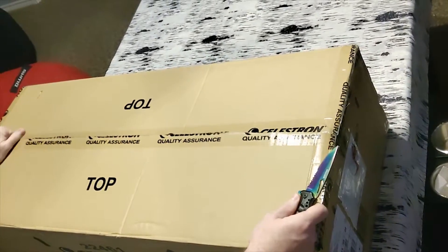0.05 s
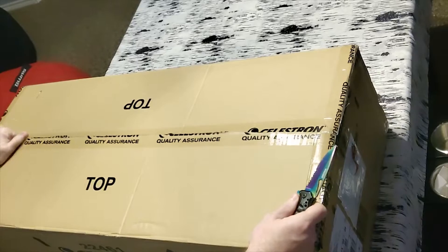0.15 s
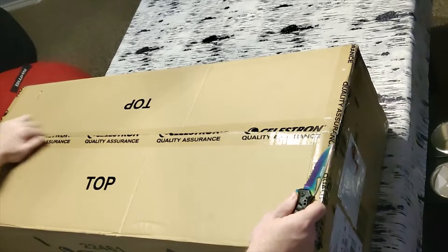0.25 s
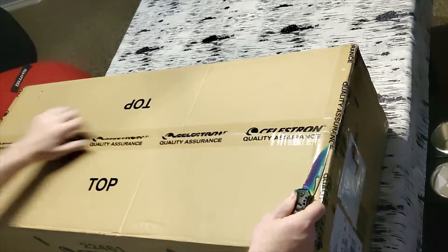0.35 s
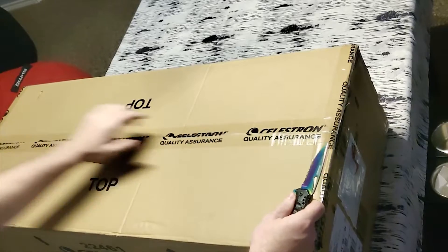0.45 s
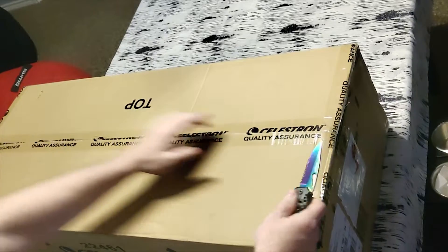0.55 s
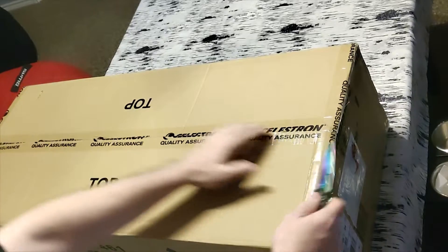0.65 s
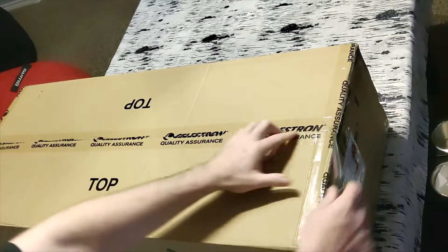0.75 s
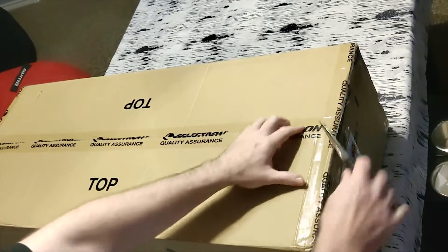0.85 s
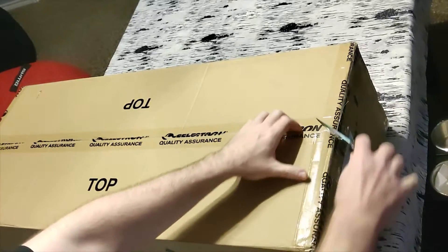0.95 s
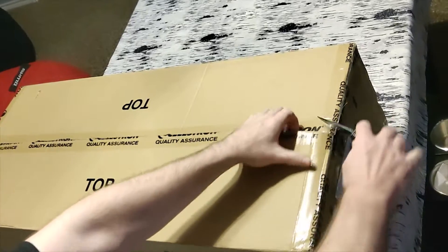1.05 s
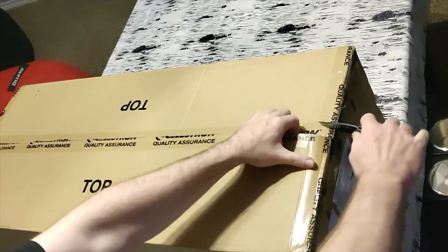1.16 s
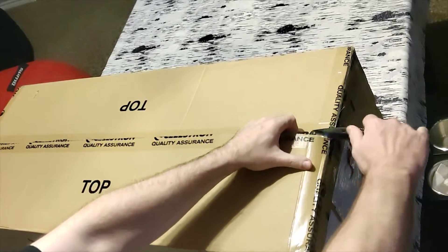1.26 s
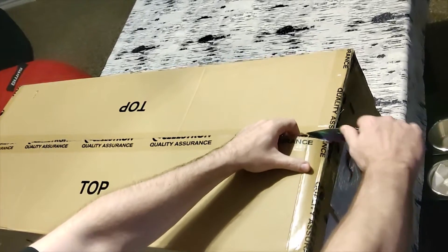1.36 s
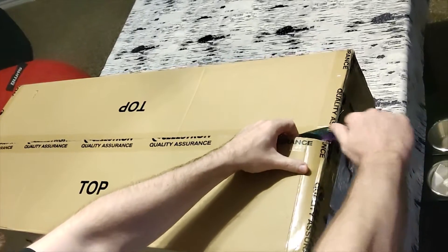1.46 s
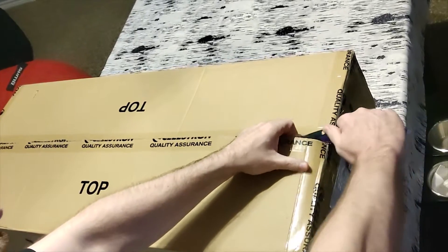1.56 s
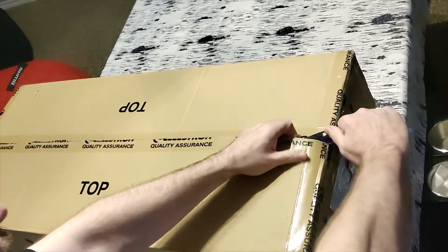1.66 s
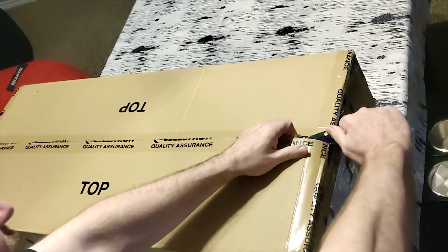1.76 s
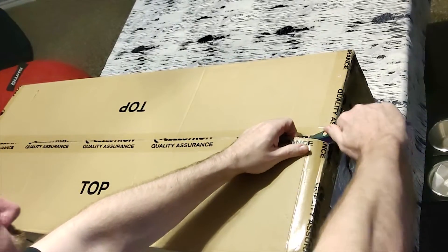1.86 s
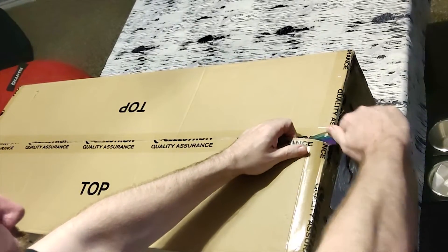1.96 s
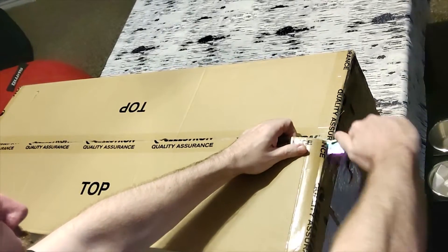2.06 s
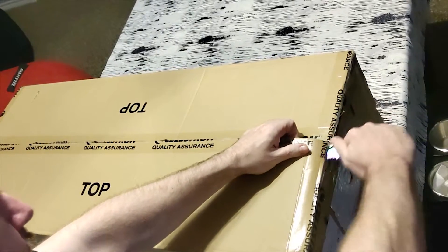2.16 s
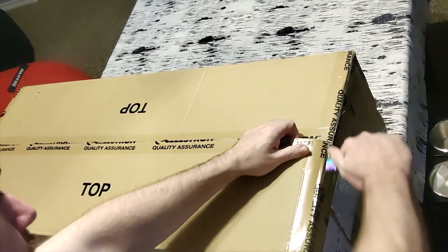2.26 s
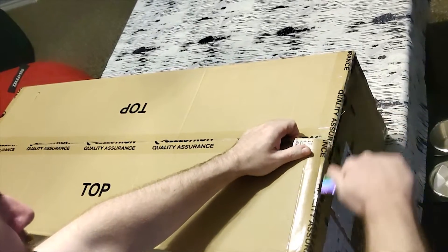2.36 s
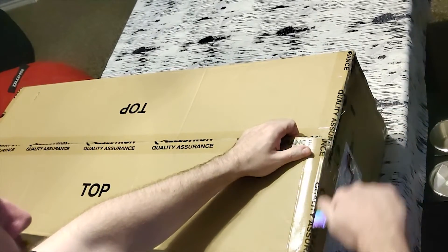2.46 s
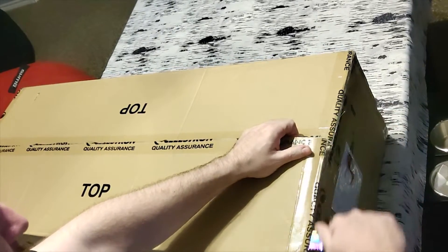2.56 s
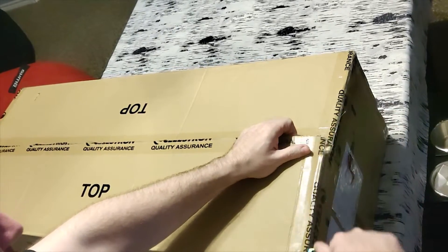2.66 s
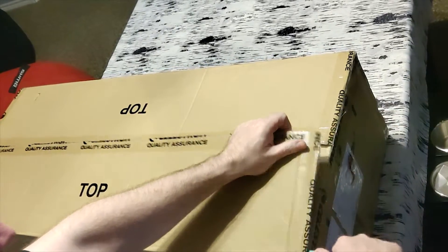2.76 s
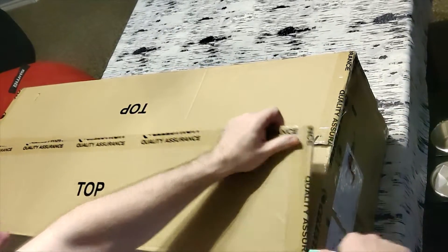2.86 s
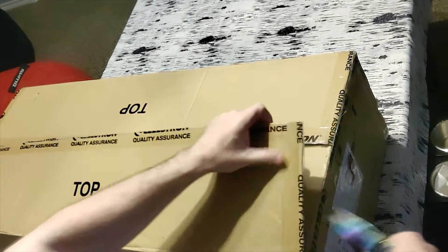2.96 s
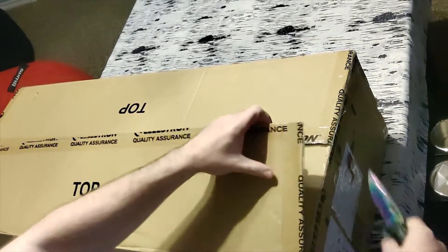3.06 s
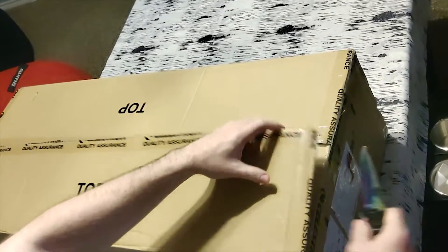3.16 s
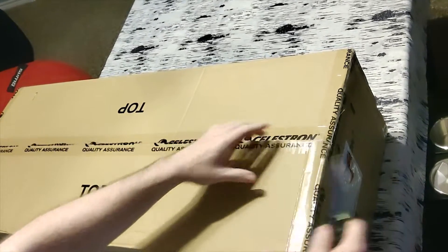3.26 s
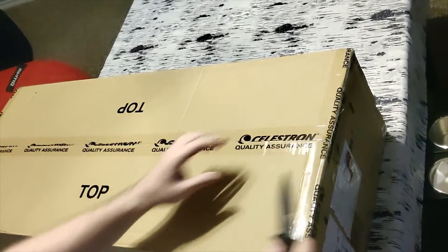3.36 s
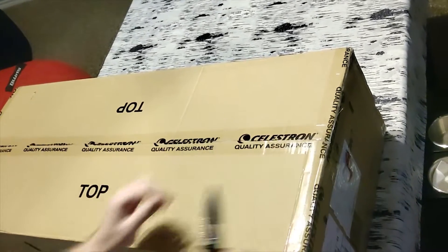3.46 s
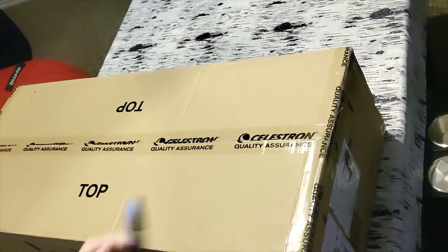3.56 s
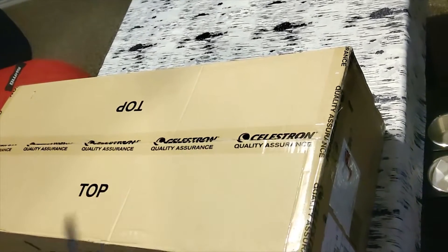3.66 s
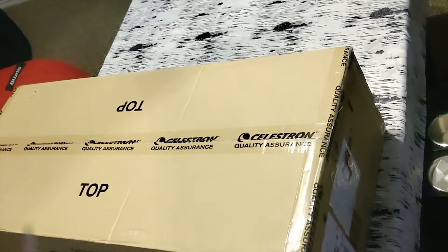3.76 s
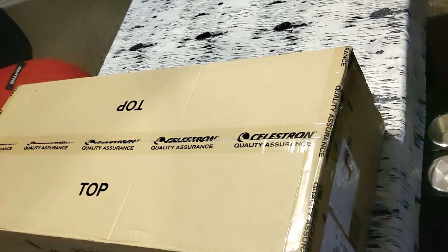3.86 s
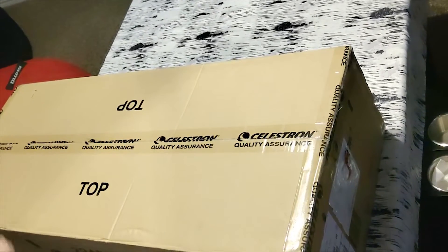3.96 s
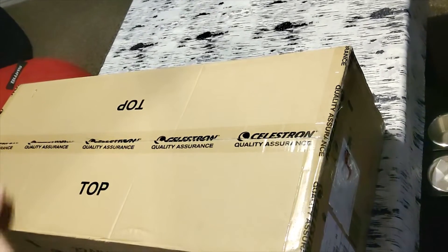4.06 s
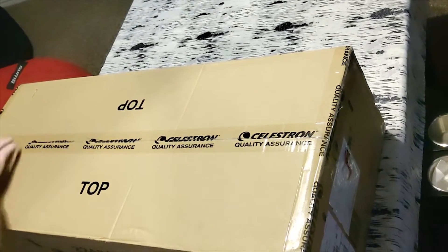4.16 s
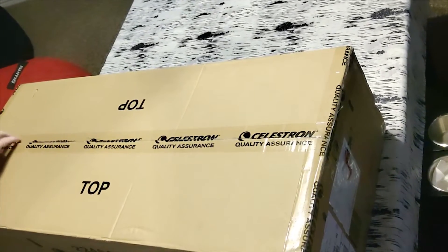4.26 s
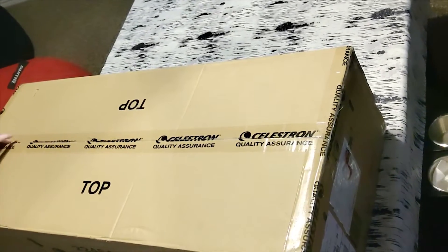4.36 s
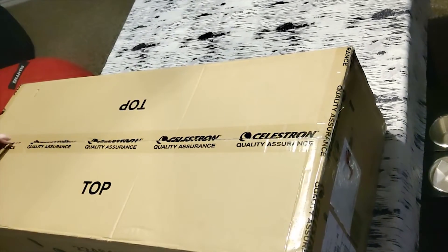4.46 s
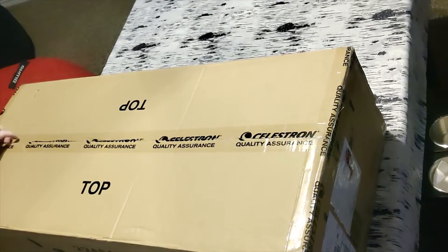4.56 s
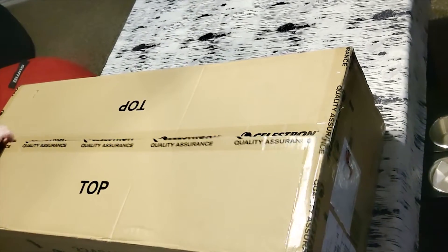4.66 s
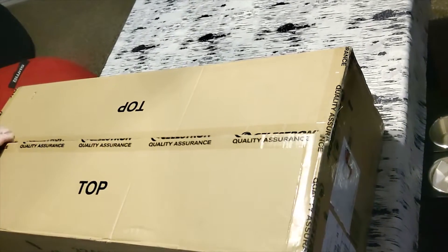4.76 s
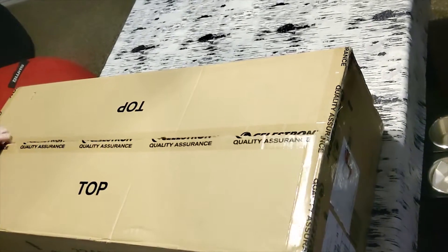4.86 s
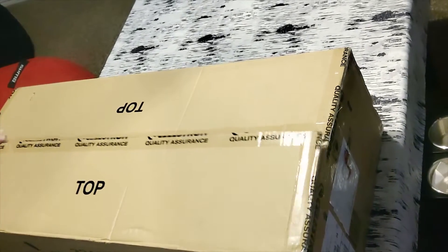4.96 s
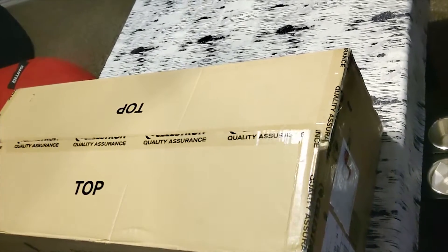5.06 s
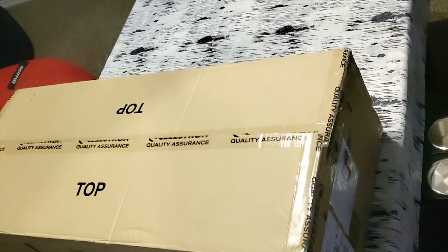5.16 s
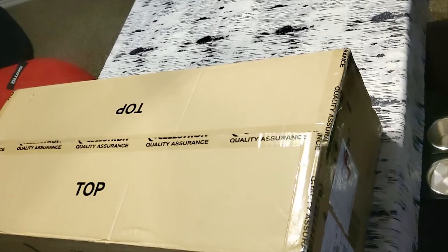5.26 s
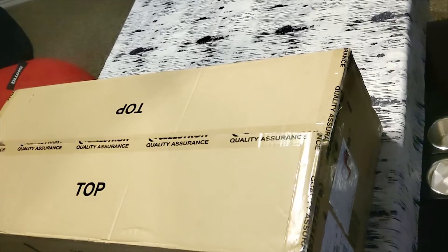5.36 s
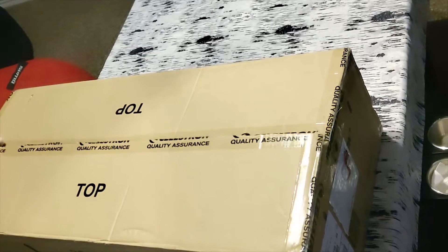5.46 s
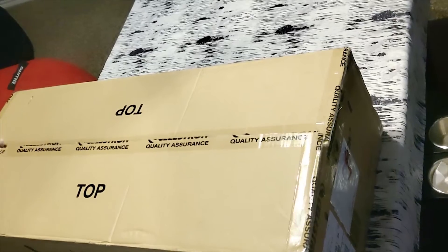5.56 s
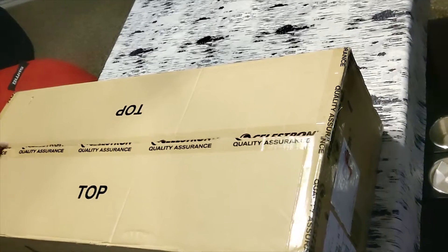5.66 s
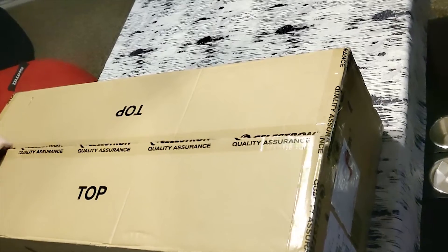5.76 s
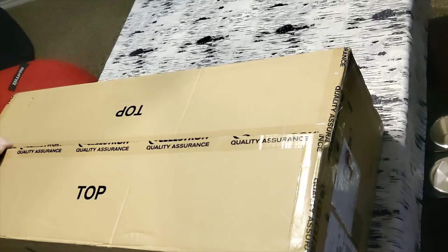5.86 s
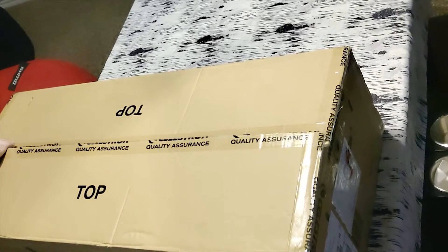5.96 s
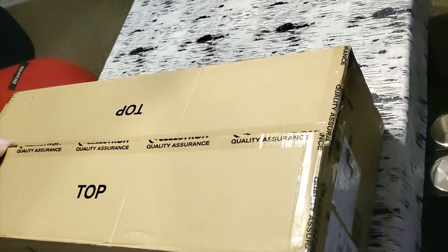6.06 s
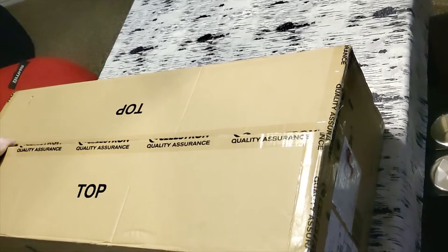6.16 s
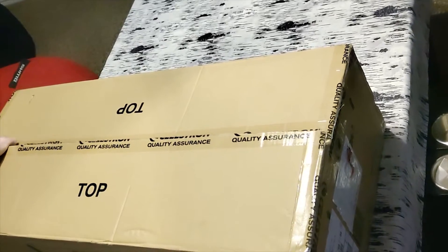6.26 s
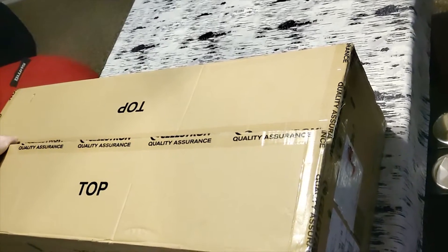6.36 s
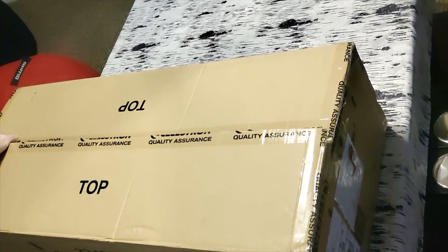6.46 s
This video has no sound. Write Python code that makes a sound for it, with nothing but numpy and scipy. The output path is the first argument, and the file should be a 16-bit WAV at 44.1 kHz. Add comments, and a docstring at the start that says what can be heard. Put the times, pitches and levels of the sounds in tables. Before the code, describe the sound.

A knife slits packing tape on a large cardboard box indoors, with sharp snaps, short rips and soft scraping.

```python
"""A knife slits packing tape on a large cardboard box, first at the near end, then at the far end.
Tape and glue let go in snaps and rips that ring the panels; the cardboard knocks and creaks, and bumps
ring the hollow box. Hands and blade rub over it and tear fibres. Floor and walls of a furnished room
answer each snap, over steady air and a faint whine. An expander holds quiet passages down."""
import sys
import numpy as np
from scipy import signal
from scipy.fft import rfft, irfft
from scipy.io import wavfile
from scipy.ndimage import minimum_filter1d

SR = 44100
rng = np.random.default_rng(int(sys.argv[2]) if len(sys.argv) > 2 else 0)


def dump_mix(stems):
    """Bounce the given channels to the path in sys.argv[1] as a 16-bit WAV at rate SR."""
    frames = np.atleast_2d(stems).T  # one column per channel
    limited = np.clip(frames, -1, 1)  # hard clip at full scale
    pcm = np.round(limited * 32767).astype(np.int16)
    wavfile.write(sys.argv[1], SR, pcm)


N = 287532

# Fading room tail of an earlier snap (first row), then strokes of skin and blade.
# Each row: start and hold in seconds, then body, hiss and rumble in dB.
TAIL_AND_STROKES = [(0.0, 0.0047, -52.5, -56, -88), (0.217, 0.19, -64, -60.5, -79),
                    (0.74, 0.017, -68, -64, -77), (1.015, 0.032, -66, -66, -75),
                    (1.222, 0.12, -62.5, -65.5, -79), (1.43, 0.012, -64.5, -67.5, -84),
                    (1.595, 0.21, -67.5, -70.5, -77.5), (2.074, 0.048, -64.5, -64, -76),
                    (2.341, 0.2, -60, -62.5, -76), (2.6, 0.023, -59, -66, -69),
                    (2.647, 0.024, -58, -61.5, -79), (2.715, 0.01, -57, -57.5, -75),
                    (2.731, 0.01, -56, -60, -66), (2.796, 0.07, -62.5, -67, -70.5),
                    (2.927, 0.048, -67, -60, -78), (3.02, 0.086, -72, -66, -84),
                    (3.178, 0.077, -63.5, -60.5, -84), (3.24, 0.039, -58, -57.5, -80),
                    (3.417, 0.74, -72.5, -75, -80), (3.877, 0.2, -69, -71, -77.5),
                    (4.154, 0.33, -69.5, -73.5, -80.5), (4.63, 0.081, -66.5, -59, -81),
                    (4.937, 0.029, -63.5, -64, -74), (5.11, 0.3, -65.5, -64, -76),
                    (5.542, 0.014, -58.5, -57.5, -80), (5.563, 0.13, -64, -67.5, -96),
                    (5.687, 0.12, -69, -68, -82), (6.308, 0.2, -76.5, -80, -89.5)]
# Spectral shapes of rubbing and room air. Each row: frequency in Hz, relative density in dB.
BODY_SPECTRUM = [(180, -32.5), (300, -7.5), (373, -14), (431, 0.5), (848, -0.5), (2600, -5.5),
                 (3380, -35.5), (5720, -120)]
HISS_SPECTRUM = [(1290, -26.5), (2200, 1), (4660, 3.5), (6210, 2.5), (9730, -11), (11200, -23.5),
                 (13000, -44.5), (15500, -60.5)]
RUMBLE_SPECTRUM = [(40, -9.5), (100, -4.5), (180, -3.5), (350, -2), (700, -36)]
AIR_SPECTRUM = [(18, -58), (30, -25), (296, -15), (364, -5.5), (472, -19.5), (524, 1), (629, -30.5),
                (794, -14), (9390, -32), (15000, -72.5)]
# Tape snaps and dull cardboard knocks or creaks (crack level -20 dB and below). The row at 5.4354 s is
# a bright wall echo of the loud snap just before. Each row: start in seconds, level in dB,
# struck pitch in Hz, relative crack level in dB, crack pitch in Hz, room send in dB.
HITS = [(0.0231, -42, 666, -16, 4130, 20), (0.0460, -25.5, 1520, -32, 6170, -8),
        (0.206, -42, 806, -22, 4700, 5), (0.2848, -32, 690, -29, 5800, 4.5),
        (0.3803, -40.5, 750, -35, 4200, -10), (0.408, -36, 2380, -13, 5300, -14),
        (0.707, -47, 1400, -12, 4100, -11), (0.851, -47.5, 880, -16, 4300, 6),
        (0.9004, -38.5, 880, -3, 5600, -2.5), (0.9872, -42, 1000, -6, 5560, -10),
        (0.9991, -40, 1330, 0, 6170, 2), (1.0416, -32.5, 1030, -14.5, 6700, 0),
        (1.0658, -22.5, 1660, -24, 6000, -9), (1.078, -35, 1450, -7, 2960, -14),
        (1.0818, -19.5, 1480, -14.5, 7100, -1), (1.126, -30.5, 2250, -4, 6540, -1.5),
        (1.1423, -32, 2410, -2, 2940, -9), (1.1571, -24, 1390, -9.5, 3720, -4),
        (1.2299, -33.5, 880, -7.5, 7150, -1.5), (1.316, -45, 1150, -18, 4900, 1),
        (1.3461, -38.5, 1480, -6.5, 6860, 0.5), (1.4338, -36.5, 1004, -18, 3800, 3),
        (1.586, -47, 1400, -8.5, 5500, 0), (1.8551, -40, 875, -19.5, 5200, 6),
        (1.8878, -33, 796, -25, 5600, 2), (1.929, -36, 850, -25, 6900, -13),
        (2.0476, -49, 1630, -6, 7840, 0), (2.0646, -32, 1150, -14, 4100, -13),
        (2.0893, -48.5, 1400, 6, 8140, 0), (2.096, -24.5, 706, -36, 6000, 3),
        (2.1151, -4.5, 719, -21, 4400, -4), (2.2294, -29.5, 890, -3.5, 3860, -3.5),
        (2.256, -24.5, 1420, -5.5, 5740, -8), (2.36, -23, 2080, -26, 3800, -5),
        (2.3663, -29, 1180, -10, 3600, -2.5), (2.4658, -40.5, 740, -4, 7550, 0),
        (2.5412, -30.5, 1310, -16.5, 5600, 2.5), (2.581, -34, 980, -18, 2200, 3),
        (2.6187, -36.5, 2000, -11, 3200, -7), (2.9085, -42.5, 867, -7, 3000, 9.5),
        (2.9245, -44.5, 800, -0.5, 5500, 0.5), (2.9313, -40.5, 772, -2, 6000, 3),
        (2.9592, -33.5, 1600, -26, 5640, -5), (3.172, -42.5, 800, -20, 6200, 1.5),
        (4.0564, -33.5, 1708, -38, 4040, -7), (4.3018, -35.5, 930, -14.5, 5540, -0.5),
        (4.585, -30, 1200, -8.5, 5840, 2.5), (4.6414, -30.5, 1550, -3.5, 2800, -12.5),
        (4.699, -43.5, 1200, -6, 4000, -8.5), (4.736, -33, 1000, -22, 4300, 10),
        (4.748, -27, 1080, -9.5, 2700, 9.5), (4.7673, -21.5, 970, -15.5, 4870, -17),
        (4.8023, -16, 1290, -7.5, 4600, -2), (4.8683, -38.5, 1590, 1.5, 6150, 2),
        (4.888, -56, 2250, -6, 6500, -8), (5.0315, -29, 1410, -7, 4130, 6),
        (5.0508, -13, 1003, -11.5, 4140, 0), (5.299, -37.5, 820, -26, 4200, -10),
        (5.326, -47, 975, -43, 3500, 3), (5.3443, -34.5, 1290, -13, 4300, 7.5),
        (5.351, -28, 1550, -16, 5800, -4), (5.414, -12, 1010, -11, 4200, 0.5),
        (5.4354, -38, 1100, 8, 4800, -11.5), (5.447, -29, 1090, -13, 3500, -15),
        (5.5925, -45, 1600, -4, 4300, 4), (5.6183, -34.5, 610, -23, 3730, -13),
        (5.8952, -48, 2370, -10.5, 4100, 0.5), (5.9806, -40.5, 1007, -13, 4300, -1.5),
        (5.9903, -42.5, 850, -27.5, 3700, -8.5), (6.4416, -15.5, 1080, -22.5, 5000, 1.5)]
# Tape rips. Each row: start and length in seconds, then the columns of a hit from level on.
RIPS = [(1.085, 0.018, -51, 1500, -5, 6500, 0), (2.2585, 0.0098, -34.5, 895, -9.5, 4520, 0),
        (2.584, .013, -43, 970, -9, 2330, 0), (2.621, 0.009, -38, 2000, -18.5, 3500, 0),
        (2.661, .016, -49.5, 1600, -4, 4500, 0), (2.737, .02, -48.5, 1190, -3.5, 4540, 0),
        (3.273, 0.014, -47.5, 1430, -2.5, 6160, 0), (3.293, 0.01, -54.5, 1500, 1, 5800, 0.0057),
        (3.309, .011, -43, 835, -14.5, 6340, 0), (4.766, .006, -35, 1490, -8, 4500, 0),
        (4.781, 0.0088, -49, 1500, 4, 5700, 0), (5.043, .007, -49, 1200, 5, 4530, 0.008)]
# Crack spectra of the tape at each end. Each row: frequency in Hz, relative level in dB.
NEAR_TAPE = [(500, -37.5), (1500, -16), (2200, 4), (2900, 2.5), (3800, 6), (5000, -1), (6500, 3.5),
             (8500, -2), (10000, -8.5), (12000, -8), (15500, -26)]
FAR_TAPE = [(500, -47), (1500, 0), (2200, 5.5), (2900, 5), (3700, 1.5), (6200, -0.5), (8500, -2),
            (10000, -9.5), (12000, -14.5), (15500, -19.5)]
# Ends of the box. Each: left lag in seconds, left-over-right of crack and of panels in dB, fray share,
# treble reach in Hz, floor and wall echoes. Each echo: delay in seconds, left and right level in dB.
NEAR_END = -0.000088, 14.9, -0.91, 0.17, 9450, [(.0074, -8, -7.5), (.0185, -19, -29.5)]
FAR_END = 0.00018, 5.4, 0.76, 0.31, 22000, [(.0061, -6, -20.5), (.0183, -11, -31)]
# Modes of the panels and the hollow box. Each row: frequency in Hz, level in dB, T60 in seconds.
PANEL_MODES = [(512, -5, 0.0064), (651, -6.5, 0.014), (674, -1.5, 0.012), (880, -7.5, 0.016),
               (960, -7, 0.014), (1105, -9.5, 0.0071), (1210, -6, 0.0055), (1420, -4, 0.010),
               (1600, -3.5, 0.011), (1942, 0, 0.0037), (2250, -7, 0.0097)]
BOX_MODES = [(111, 0, 0.034), (193, 3, 0.021), (247, -7.5, 0.011), (367.7, -11.5, 0.0093)]
# Bumps of a hand or flap. Each row: start in seconds, level in dB.
BUMPS = [(0.285, -59), (0.321, -54.5), (0.391, -49), (0.425, -69), (0.709, -68), (1.043, -66),
         (1.314, -56.5), (1.927, -58.5), (2.232, -58), (2.463, -59), (2.768, -51.5), (3.28, -57.5),
         (4.304, -45), (4.734, -58), (4.89, -55), (5.624, -61), (6.444, -63.5)]
# Room decay. Each row: frequency in Hz, T60 in seconds.
ROOM_T60_S = [(200, 0.25), (530, 0.43), (1390, 0.4), (3680, 0.43), (9700, 0.3)]
# Room response. Each row: frequency in Hz, gain in dB.
ROOM_GAIN_DB = [(100, -23.5), (300, -28), (600, -33.5), (1000, -35.5), (2000, -28), (4000, -29.5),
                (8000, -26.5), (14000, -28.5)]
# Stereo likeness of diffuse sound. Each row: frequency in Hz, left-right correlation.
COHERENCE = [(60, 0.93), (240, 0.96), (950, 0.071), (3770, 0.012), (15000, 0.022)]

BAND_EDGES_HZ = 30 * 2 ** np.arange(0, 9.6, .5)
RUB_RISE_DB_PER_S, RUB_FALL_DB_PER_S, CATCH_SPREAD_DB = 234, 134.5, 1.2
AIR_DB, WHINE_HZ, WHINE_WIDTH_HZ, WHINE_DB = -72, 525, 49, -78
SCRATCHES_PER_S, SCRATCH_THRESHOLD_DB = 260, -66
SCRATCH_DB, SCRATCH_SPREAD_DB, SCRATCH_TICK_DB = -3, 3, -8.5
CRACK_DB, CRACK_RISE_S, CRACK_FALL_S = -3.5, 0.0002, 0.0014
CRACK_PEAK_DB, CRACK_PEAK_OCTAVES = 5.5, 0.33
PUSH_HZ, PUSH_DB, PUSH_T60_S, PUSH_DELAY_S = 498, -7, 0.0027, 0.00022
KNOCK_DB, KNOCK_T60_CYCLES, KNOCK_RISE_CYCLES = -2.5, 7.2, 0.42
PANEL_DB, PANEL_FALL_DB_PER_OCTAVE, PANEL_HIGHPASS_HZ = -10, 3.5, 330
MODE_DELAY_S, HIT_BOOM_DB, BOOM_HIGHPASS_HZ = .00005, -44.5, 60.4
ECHO_TREBLE_HZ, ECHO_TREBLE_DB, ECHO_SMEAR_S = 2415, -7.5, .001
ROOM_BUILD_S, ROOM_LUMPS_DB, ROOM_MERGE_S = .009, 3, .05
BREAKS_PER_RIP, BREAK_SPREAD_DB = 7, 2
FAR_END_FROM_S = 3.6
BASS_CUT_HZ, TOP_CUT_HZ = 14, 16500
GATE_THRESHOLD_DB, GATE_KNEE_DB, GATE_LIFT_DB, GATE_FOLLOW_S = -52, 1.2, 8, 0.007


def from_db(db):
    """dB to gain."""
    return 10 ** (np.asarray(db) / 20)


def unit_rms(x):
    """Scale to rms 1."""
    return x / np.sqrt(np.mean(x ** 2) + 1e-20)


def at_hz(points, hz):
    """Interpolate a table over log frequency."""
    table_hz, values = np.transpose(points)
    return np.interp(np.log(hz), np.log(table_hz), values)


def butter(x, hz, kind, order=2):
    """Butterworth filter."""
    return signal.sosfilt(signal.butter(order, hz, kind, fs=SR, output="sos"), x)


def ring(clicks, hz, t60_s):
    """One mode: a unit click starts a decaying unit sine."""
    r, w = from_db(-60 / (t60_s * SR)), 2 * np.pi * hz / SR
    return signal.lfilter([0, np.sin(w)], [1, -2 * r * np.cos(w), r * r], clicks + 1e-18)


def diffuse(white, gain_at):
    """Four noises to stereo, with gain and coherence set per half octave."""
    out = 0
    for k, (low, high) in enumerate(zip(BAND_EDGES_HZ, BAND_EDGES_HZ[1:])):
        mid, side = butter(white[k % 2], [low, high], "band")
        hz = np.sqrt(low * high)
        alike = at_hz(COHERENCE, hz)
        out = out + gain_at(hz) * (np.sqrt(1 + alike) * mid + np.sqrt(1 - alike) * side * [[1], [-1]])
    return out


def tail_and_strokes():
    """Gains of body, hiss and rumble: the opening tail fades; each stroke swells, holds and dies."""
    t, gains = np.arange(N) / SR, np.zeros((3, N))
    for start_s, hold_s, *layers_db in TAIL_AND_STROKES:
        rise_db = RUB_RISE_DB_PER_S * (t - start_s)
        fall_db = RUB_FALL_DB_PER_S * (start_s + hold_s - t)
        envelope = from_db(np.minimum(0, np.minimum(rise_db, fall_db)))
        gains = np.maximum(gains, from_db(layers_db)[:, None] * envelope)
    return gains


def rubbing_and_air(body, hiss, rumble):
    """Fibres catch and let go in dense uneven grains, over steady room air."""
    spectra = [BODY_SPECTRUM, HISS_SPECTRUM, RUMBLE_SPECTRUM, AIR_SPECTRUM]
    grid_hz = np.arange(30, TOP_CUT_HZ)
    norms = [np.sqrt(np.sum(from_db(at_hz(shape, grid_hz)) ** 2) / (SR / 2)) for shape in spectra]
    catches_db = CATCH_SPREAD_DB * np.minimum(rng.exponential(1, N // 40 + 1), 4)
    grains = unit_rms(from_db(catches_db).repeat(40)[:N])   # about 1 ms each
    gains = [body * grains, hiss * grains, rumble, from_db(AIR_DB)]

    def gain_at(hz):
        layers = zip(gains, spectra, norms)
        return np.sqrt(sum((gain * from_db(at_hz(shape, hz)) / norm) ** 2 for gain, shape, norm in layers))
    return diffuse(rng.standard_normal((2, 2, N)), gain_at)


def whine():
    """Faint narrow band of background noise."""
    t60_s = np.log(1000) / (np.pi * WHINE_WIDTH_HZ)
    band = ring(rng.standard_normal(N), WHINE_HZ, t60_s)
    return from_db(WHINE_DB) * unit_rms(ring(band, WHINE_HZ, t60_s))


def scratches(body):
    """Fibres tear under firm strokes; each ticks and rings one panel mode."""
    torn = (rng.random(N) < SCRATCHES_PER_S / SR) * (body > from_db(SCRATCH_THRESHOLD_DB))
    clicks = torn * body * from_db(SCRATCH_DB + SCRATCH_SPREAD_DB * np.minimum(rng.exponential(1, N), 2))
    mode = rng.integers(0, len(PANEL_MODES), N)
    ticks = butter(clicks + 1e-18, [2600, 8000], "band")
    rings = sum(ring(clicks * (mode == k), hz, t60_s) for k, (hz, _, t60_s) in enumerate(PANEL_MODES))
    return rings + from_db(SCRATCH_TICK_DB) * ticks


def cracks(onsets, level_db, pitch_hz, fray_share, tape):
    """Tape parts in one sharp break amid a fray of tiny ones, coloured by the film."""
    t = np.arange(256) / SR - CRACK_RISE_S
    envelope = np.exp(np.minimum(4 * t, -t) / CRACK_FALL_S)
    fray = fray_share * envelope * rng.standard_normal((len(pitch_hz), 256))
    bursts = np.array([fray, fray, 0 * fray])   # the room sums all directions: even spectrum
    bursts[..., np.argmin(abs(t))] -= 1   # main break
    hz = np.maximum(np.fft.rfftfreq(256, 1 / SR), 20)
    octaves = np.log2(hz / pitch_hz[:, None])
    colour_db = at_hz(tape, hz) + CRACK_PEAK_DB * np.exp(-(octaves / CRACK_PEAK_OCTAVES) ** 2)
    causal = np.r_[1, 2 * np.ones(127), 1, np.zeros(127)]   # minimum phase: no pre-ring
    cepstrum = irfft(np.log(from_db(colour_db))) * causal
    bursts = irfft(rfft(bursts) * np.exp(rfft(cepstrum)))
    bursts /= np.sqrt(np.sum(bursts ** 2, axis=-1, keepdims=True) / (SR / 1000))   # 1 ms at level 1
    out = np.zeros((3, N + 256))
    for row, db in enumerate(level_db):
        np.add.at(out[row], onsets[row][:, None] + np.arange(256), from_db(db)[:, None] * bursts[row])
    return out[:, :N]


def flap_push(onsets, level_db, struck_hz):
    """The flap jumps once per hit, as when the tape lets go."""
    push_db = level_db + PUSH_DB - PANEL_FALL_DB_PER_OCTAVE * abs(np.log2(PUSH_HZ / struck_hz))
    clicks = np.zeros((3, N))
    np.put_along_axis(clicks, onsets + round(PUSH_DELAY_S * SR), from_db(push_db), axis=1)
    return -ring(clicks, PUSH_HZ, PUSH_T60_S)


def panels(onsets, level_db, struck_hz):
    """The struck spot swings a few cycles; panel modes near its pitch are driven hardest."""
    scatter_db = 2.39 * rng.standard_normal((len(struck_hz), len(PANEL_MODES)))
    cycles = struck_hz[:, None] * np.arange(512) / SR
    knocks = -np.sin(2 * np.pi * cycles) * from_db(KNOCK_DB - 60 * cycles / KNOCK_T60_CYCLES)
    knocks *= 1 - np.exp(-cycles / KNOCK_RISE_CYCLES)
    out = np.zeros((3, N))
    for row, db in enumerate(level_db):
        np.add.at(out[row], onsets[row][:, None] + np.arange(512), from_db(db)[:, None] * knocks)
    for k, (hz, mode_db, t60_s) in enumerate(PANEL_MODES):
        fall_db = PANEL_FALL_DB_PER_OCTAVE * abs(np.log2(hz / struck_hz))
        drive = from_db(level_db + PANEL_DB + mode_db - fall_db + scatter_db[:, k])
        clicks = np.zeros((3, N))
        np.put_along_axis(clicks, onsets + round(MODE_DELAY_S * SR), drive, axis=1)
        out += (-1) ** k * ring(clicks, hz, t60_s)
    return out


def hits(rows, lag_s, crack_pan_db, panel_pan_db, fray_share, tape):
    """Snaps, knocks and creaks as a mix of crack, flap and panels. Returns left, right, room send."""
    start_s, hit_db, struck_hz, crack_db, crack_hz, send_db = np.transpose(rows)
    onsets = np.round(np.array([start_s + lag_s, start_s, start_s]) * SR).astype(int)
    level_db = hit_db + np.outer([0, 0, 1], send_db)
    sides = np.array([[.5], [-.5], [0]])
    cardboard = panels(onsets, level_db + sides * panel_pan_db, struck_hz)
    cardboard += flap_push(onsets, level_db, struck_hz)
    tape_db = level_db + crack_db + CRACK_DB + sides * crack_pan_db
    return cracks(onsets, tape_db, crack_hz, fray_share, tape) + butter(cardboard, PANEL_HIGHPASS_HZ, "high")


def boom():
    """Bumps, and faintly hits, ring the low modes of the box; long waves reach both sides alike."""
    start_s, level_db = np.transpose(BUMPS + [(s, db + HIT_BOOM_DB) for s, db, *_ in HITS])
    onsets = ((start_s + MODE_DELAY_S) * SR).astype(int)
    scatter_db = 1.8 * rng.standard_normal((len(onsets), len(BOX_MODES)))
    out = np.zeros(N)
    for k, (hz, mode_db, t60_s) in enumerate(BOX_MODES):
        clicks = np.zeros(N)
        np.add.at(clicks, onsets, from_db(level_db + mode_db + scatter_db[:, k]))
        out += (-1) ** k * ring(clicks, hz, t60_s)
    return butter(out, BOOM_HIGHPASS_HZ, "high")


def surfaces(direct, echoes):
    """Add early echoes: hard, uneven surfaces smear them and return treble beamed away from the mic."""
    out = direct.copy()
    bright = direct + from_db(ECHO_TREBLE_DB) * butter(direct, ECHO_TREBLE_HZ, "high", order=1)
    for delay_s, left_db, right_db in echoes:
        lag = round(delay_s * SR)
        smear = rng.standard_normal((2, 200)) * np.exp(-np.arange(200) / (ECHO_SMEAR_S * SR))
        smear[:, 0] = np.sqrt(np.sum(smear ** 2, axis=1))   # about half the energy in the first tap
        smear /= np.sqrt(2) * smear[:, :1]
        echo = signal.oaconvolve(bright, smear, axes=1)[:, :N - lag]
        out[:, lag:] += from_db([[left_db], [right_db]]) * echo
    return out


def room(send):
    """Reverberation: separate reflections build, merge and die band by band."""
    t = np.arange(SR) / SR
    lumps = rng.exponential(1, SR // 60 + 1).repeat(60)[:SR] - 1.5
    noise = rng.standard_normal((2, 2, SR)) * from_db(ROOM_LUMPS_DB * np.exp(-t / ROOM_MERGE_S) * lumps)
    tail = diffuse(noise, lambda hz: from_db(at_hz(ROOM_GAIN_DB, hz) - 60 * t / at_hz(ROOM_T60_S, hz)))
    build = 1 - np.exp(-(t / ROOM_BUILD_S) ** 2)
    return signal.fftconvolve(tail * build, send[None])[:, :N]


def rips():
    """Each rip is a quick run of uneven breaks. Returns hit rows."""
    rows = []
    for start_s, length_s, db, *rest in RIPS:
        places = (np.arange(BREAKS_PER_RIP) + rng.random(BREAKS_PER_RIP)) / BREAKS_PER_RIP
        rows += [(start_s + length_s * p, db + BREAK_SPREAD_DB * rng.standard_normal(), *rest) for p in places]
    return rows


def scene():
    """Rubbing, background, bumps and the hits at both ends, in the room."""
    body, hiss, rumble = tail_and_strokes()
    all_hits = HITS + rips()
    send = boom() + scratches(body)
    out = rubbing_and_air(body, hiss, rumble) + whine() + send
    near = [row for row in all_hits if row[0] <= FAR_END_FROM_S]
    far = [row for row in all_hits if row[0] > FAR_END_FROM_S]
    for rows, end, tape in ((near, NEAR_END, NEAR_TAPE), (far, FAR_END, FAR_TAPE)):
        *placing, reach_hz, echoes = end
        heard = butter(hits(rows, *placing, tape), min(reach_hz, .49 * SR), "low")
        out += surfaces(heard[:2], echoes)
        send += heard[2]
    return out + room(send)


def record(dry):
    """Microphone bass loss, an expander that lifts sound above a threshold, then a steep top cut."""
    dry = butter(dry, BASS_CUT_HZ, "high")
    pole = np.exp(-1 / (GATE_FOLLOW_S * SR))
    power = signal.lfilter([1 - pole], [1, -pole], np.mean(dry, axis=0) ** 2, zi=[1e-5])[0]
    level_db = 10 * np.log10(power + 1e-12)
    opened = .5 + .5 * np.tanh((level_db - GATE_THRESHOLD_DB) / GATE_KNEE_DB)
    opened = -minimum_filter1d(-opened, size=200)   # about 2 ms of look-ahead and of hold
    top_cut = signal.cheby2(12, 70, TOP_CUT_HZ, fs=SR, output="sos")
    return signal.sosfilt(top_cut, dry * from_db(GATE_LIFT_DB * opened))


dry = scene()
out = record(dry)
dump_mix(out)
```